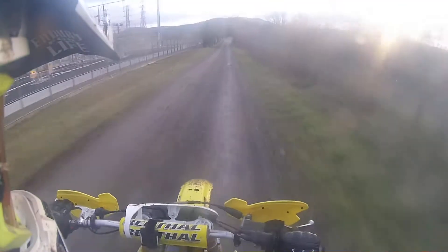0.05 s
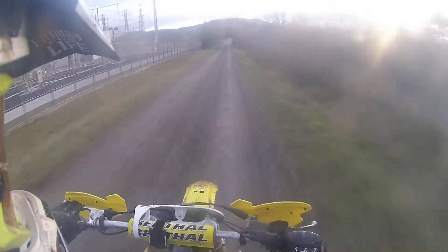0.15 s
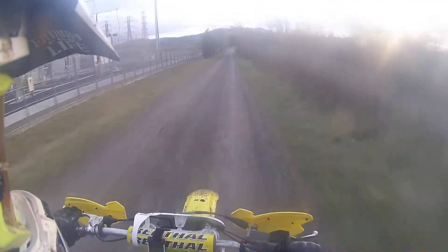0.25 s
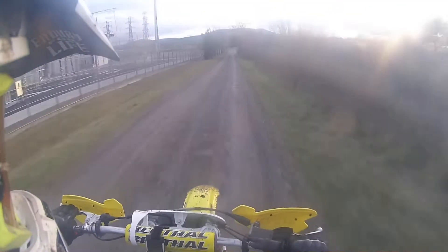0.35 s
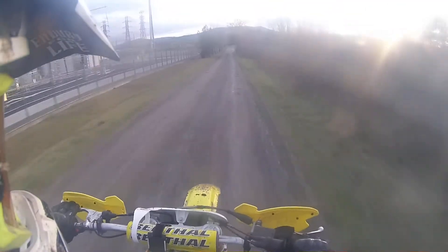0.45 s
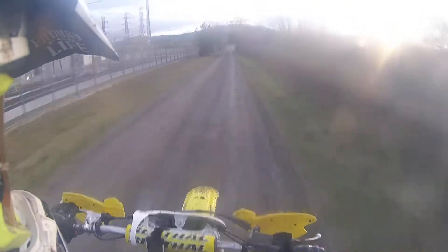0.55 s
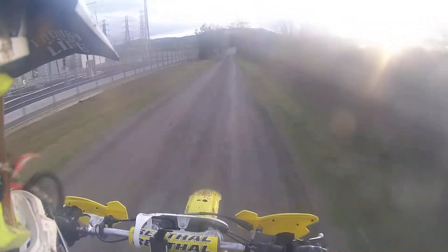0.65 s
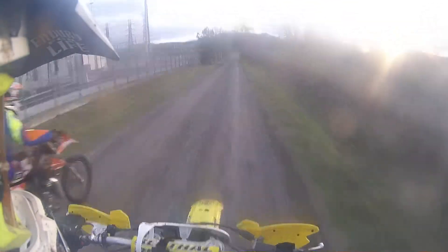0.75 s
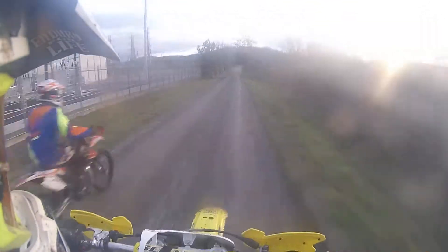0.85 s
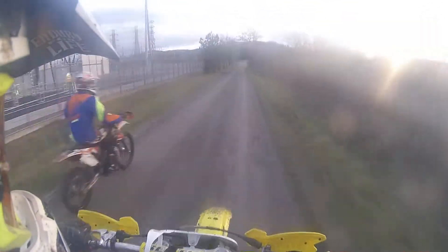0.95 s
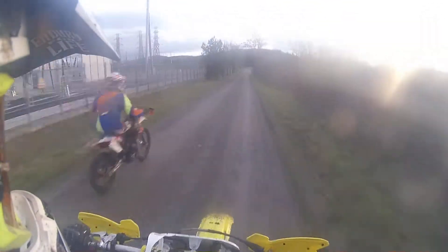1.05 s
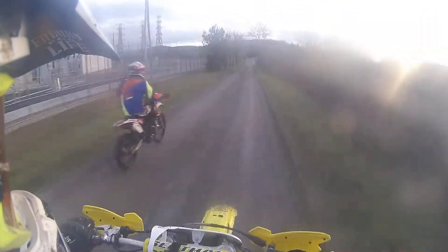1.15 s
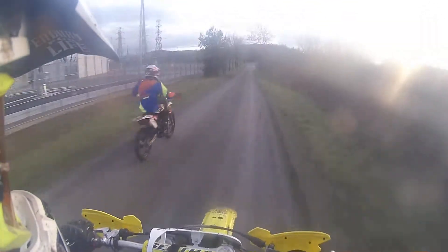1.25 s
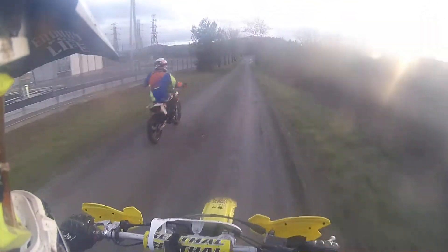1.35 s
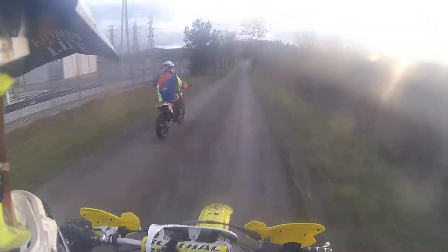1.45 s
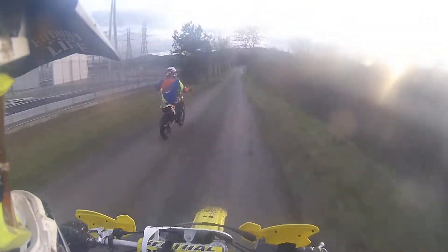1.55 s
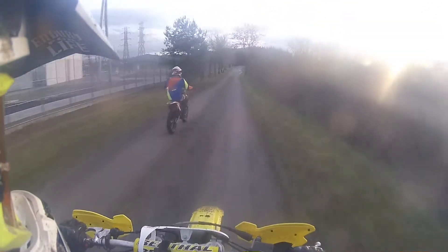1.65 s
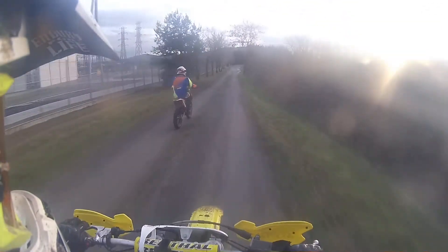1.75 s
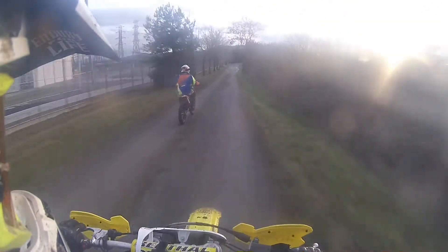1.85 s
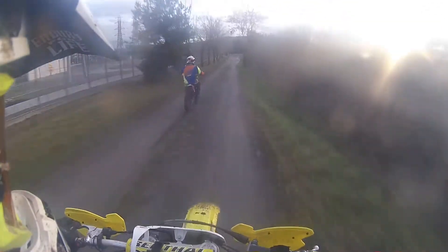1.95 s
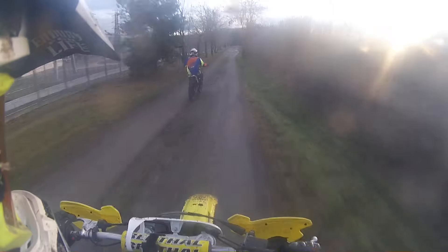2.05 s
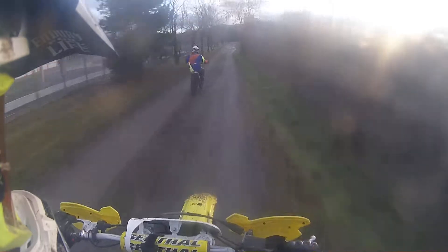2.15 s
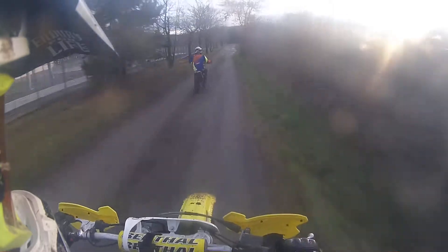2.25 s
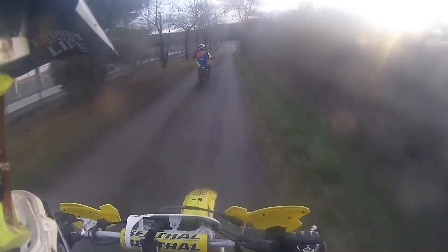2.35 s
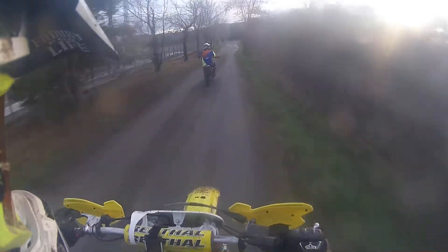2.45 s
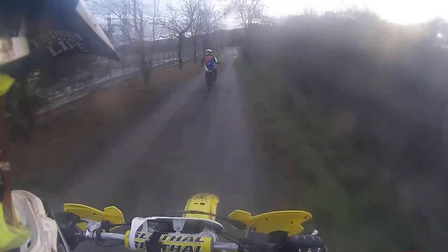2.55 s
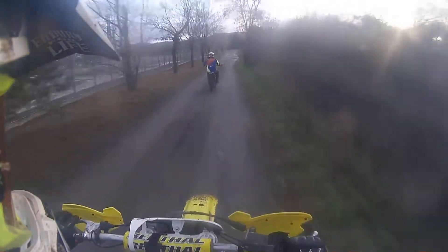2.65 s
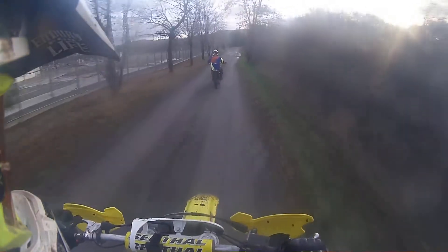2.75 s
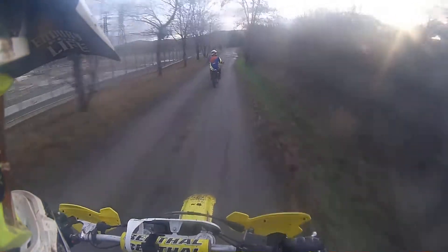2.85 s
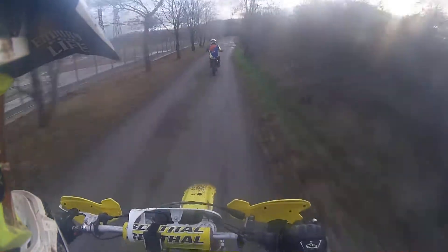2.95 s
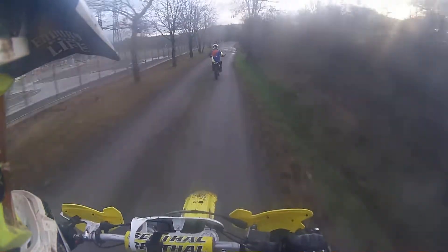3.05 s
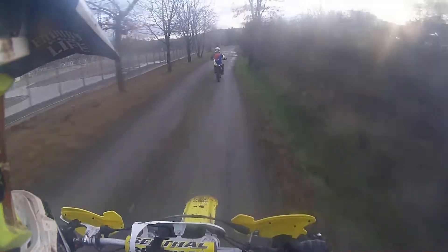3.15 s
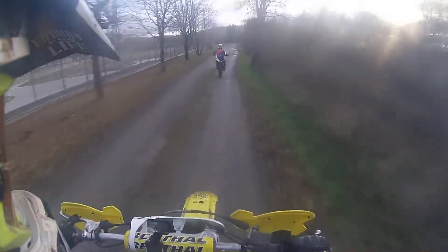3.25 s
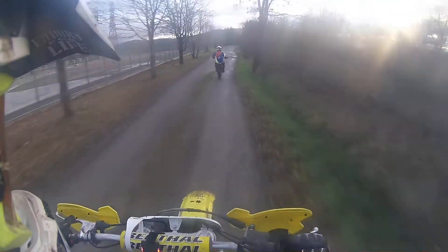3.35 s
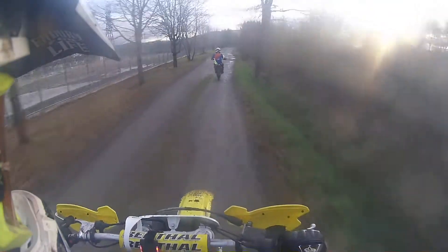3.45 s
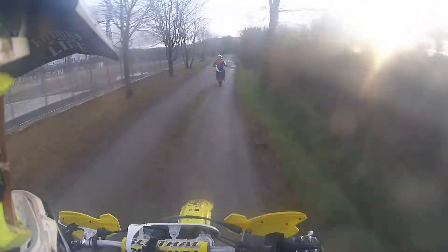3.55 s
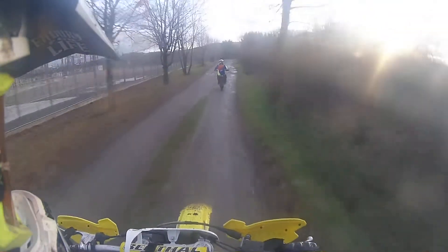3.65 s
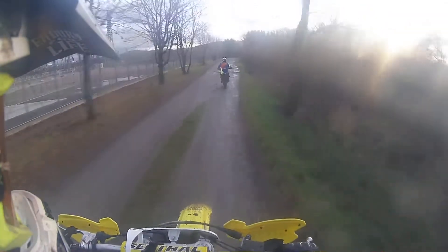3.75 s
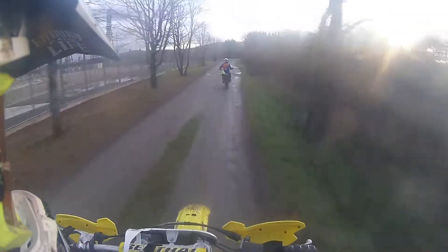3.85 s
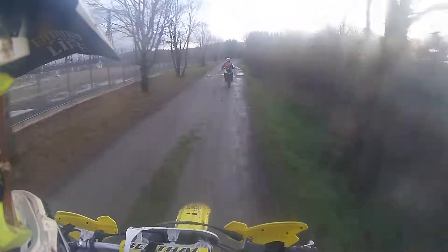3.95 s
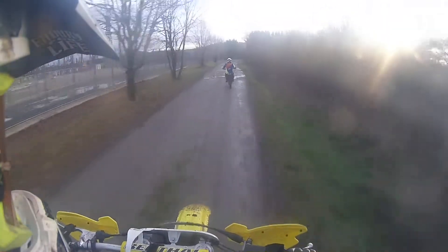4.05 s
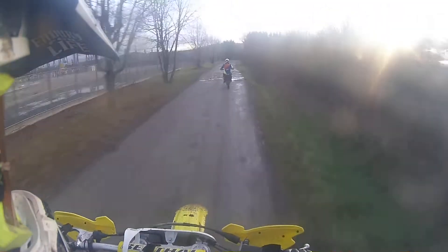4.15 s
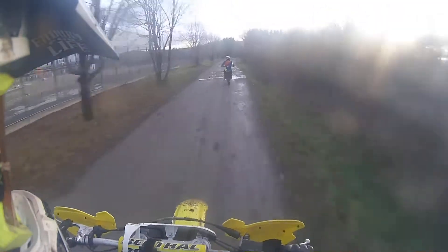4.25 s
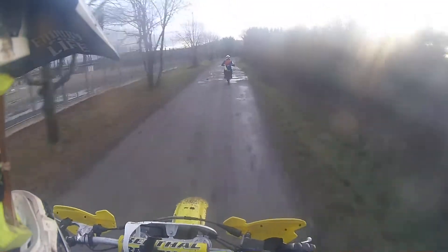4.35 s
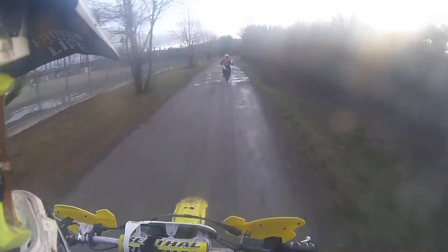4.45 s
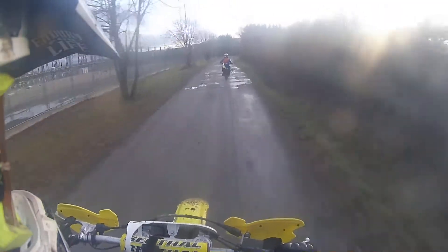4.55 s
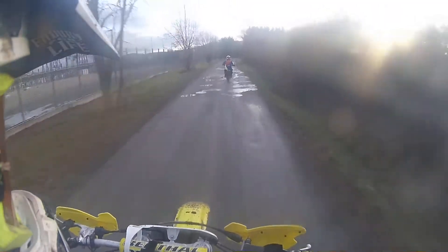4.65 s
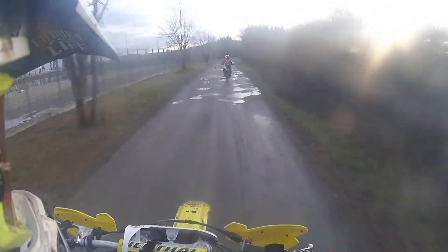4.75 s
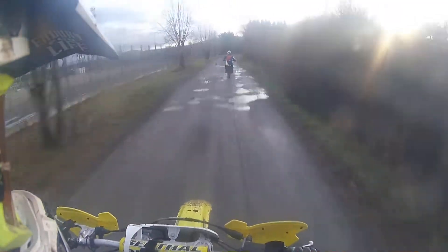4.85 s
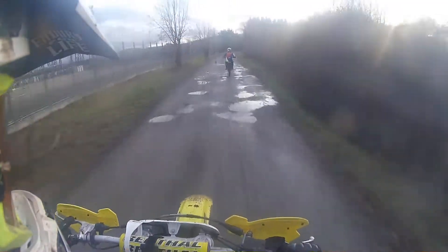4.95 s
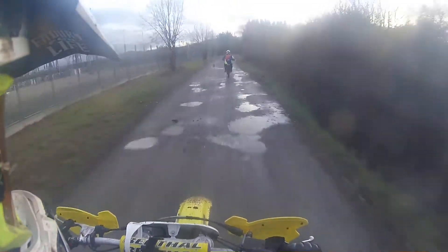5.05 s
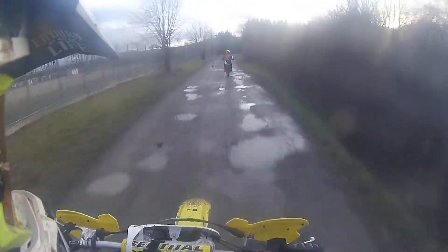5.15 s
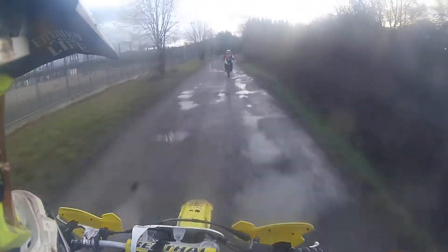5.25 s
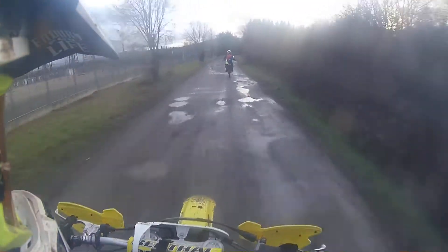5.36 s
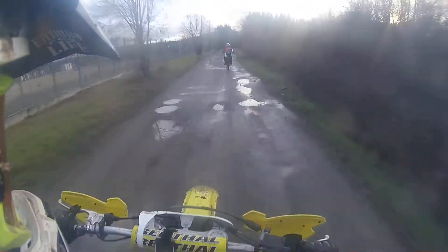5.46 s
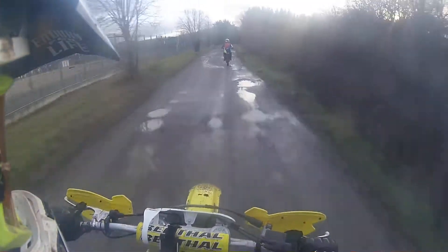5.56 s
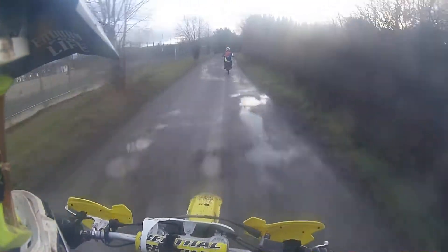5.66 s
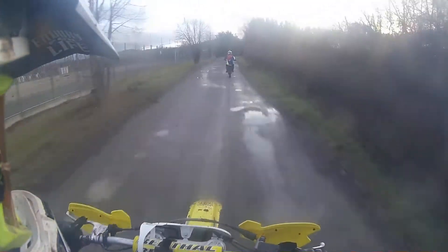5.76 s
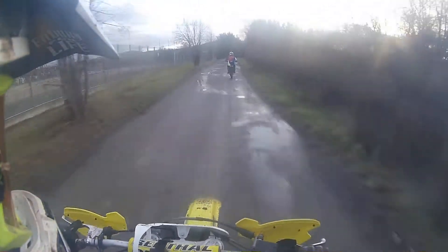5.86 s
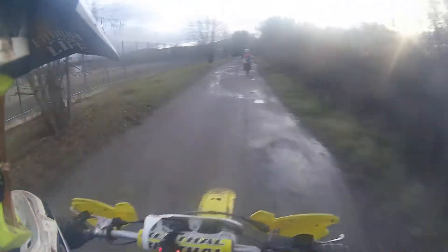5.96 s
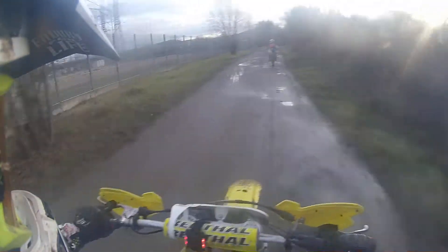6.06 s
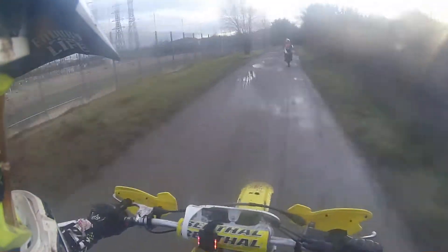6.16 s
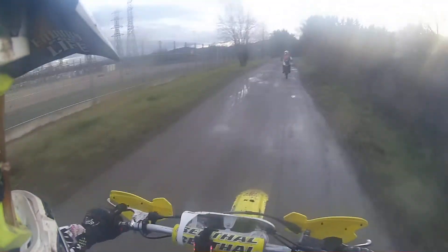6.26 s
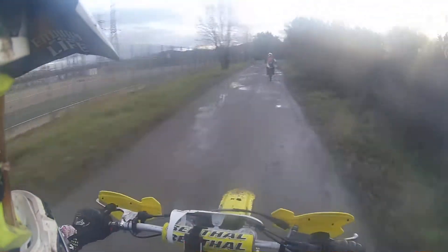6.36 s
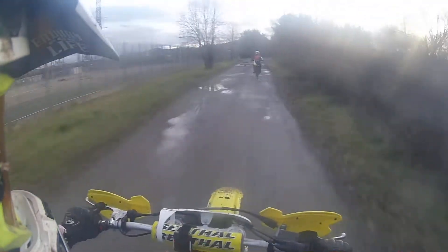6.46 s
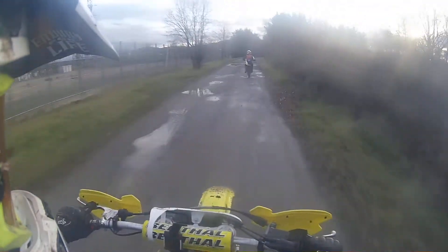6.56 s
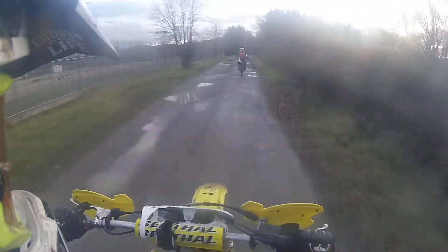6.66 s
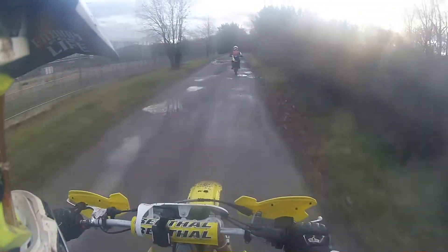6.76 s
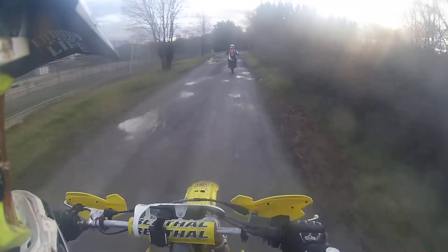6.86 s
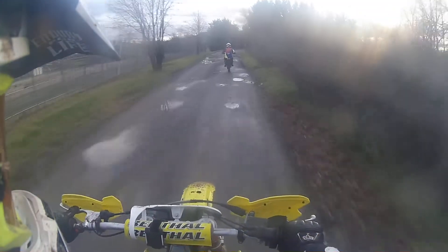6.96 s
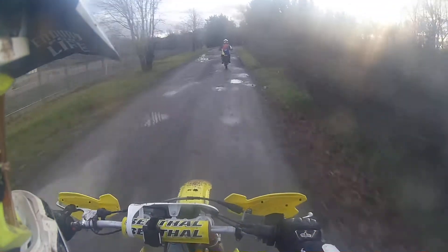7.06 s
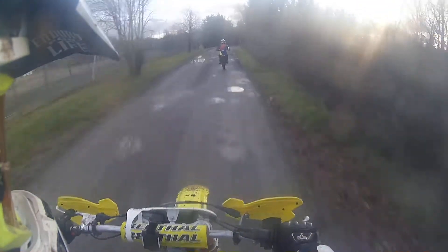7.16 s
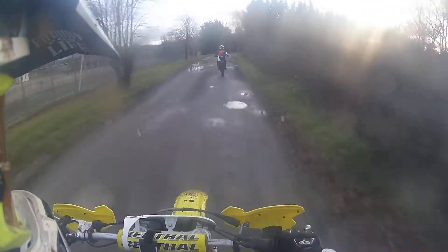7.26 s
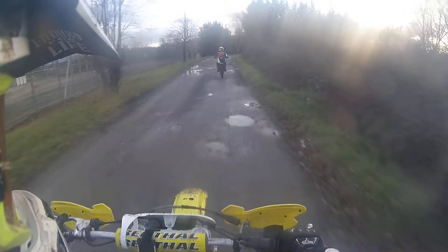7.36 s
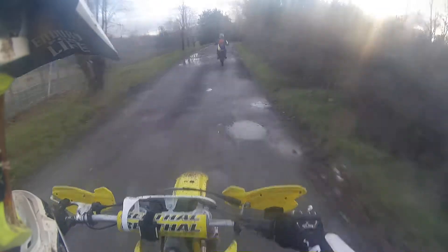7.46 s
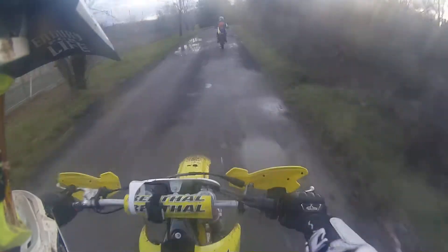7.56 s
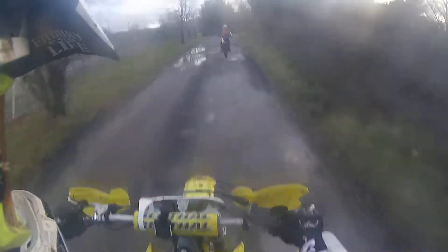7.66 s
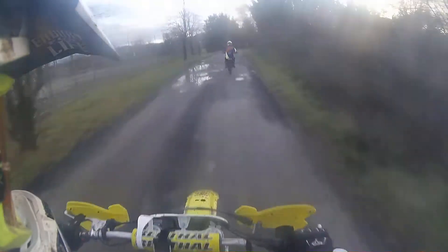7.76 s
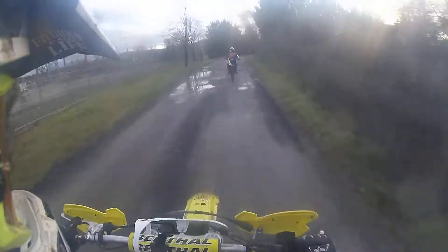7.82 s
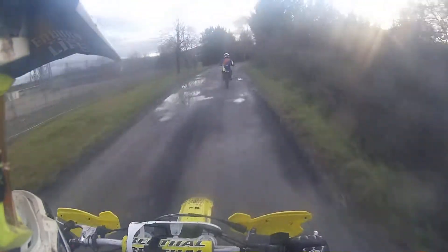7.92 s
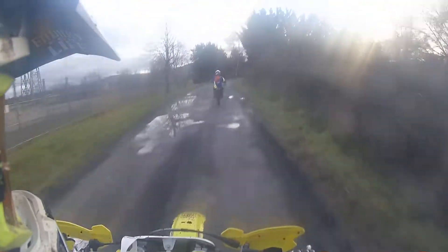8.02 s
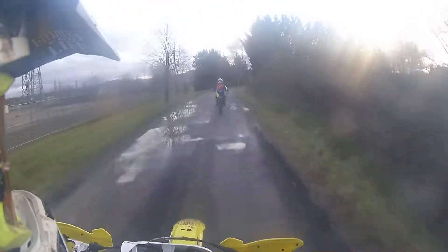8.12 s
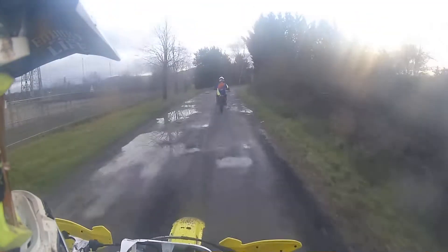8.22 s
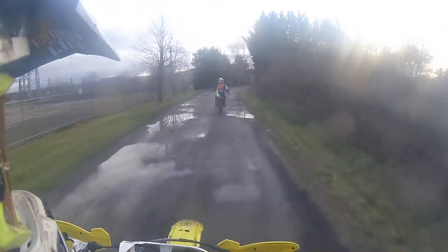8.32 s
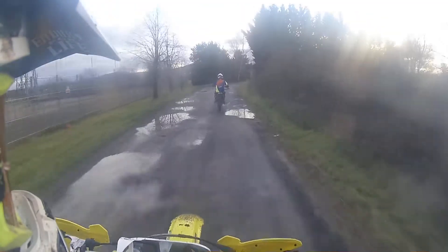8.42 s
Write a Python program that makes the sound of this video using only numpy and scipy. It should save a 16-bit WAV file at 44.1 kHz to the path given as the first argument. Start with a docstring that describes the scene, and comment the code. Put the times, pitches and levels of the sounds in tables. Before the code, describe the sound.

A single-cylinder dirt bike revs loud and high from the start, climbing slightly for the first second, heard close and boxy through a plastic housing on the rider's helmet. A second bike overtakes with a wavering, raspy drone, loudest around 0.8 seconds and gone by 1.3. From 1 second the engine pitch drops sharply, bottoming out near 1.7, then picks up at 2 seconds into a steadier, thumping run that slowly sinks. From about 2.1 to 5.7 seconds a loose part knocks and clicks against the housing in quick irregular hits, strongest before 4 seconds. The engine firms up slightly around 6 seconds, then eases off from 7, with a few lighter clicks between 7.4 and the end at 8.5 seconds. Low wind buffeting and the hiss of chain and tyres run underneath, gradually fading along with the engine.

```python
"""Dirt bike from a helmet camera

A single-cylinder bike, heard inside a closed plastic housing, revs, shuts off, picks up and slows to a
steady run. Each firing thumps the exhaust pipe and raps the housing. Chain, tyres and wind roar behind
it, a loose part knocks on the housing over the bumps, and a second bike overtakes early on."""
import sys
import numpy as np
from scipy import signal
from scipy.fft import rfft, irfft, next_fast_len
from scipy.io import wavfile
from scipy.ndimage import uniform_filter1d, map_coordinates

SR = 44100
rng = np.random.default_rng(int(sys.argv[2]) if len(sys.argv) > 2 else 0)


def file_out(sig):
    """Save sig as 16-bit WAV at sys.argv[1]."""
    # one column per channel
    cols = np.atleast_2d(sig).T
    # limit, then scale
    lim = np.clip(cols, -1, 1)
    pcm = np.round(lim * 32767).astype(np.int16)
    wavfile.write(sys.argv[1], SR, pcm)


N = 374409

# Engine speed: t/s, firing rate/Hz
FIRING_RATE = [(0, 83.6), (.412, 91.4), (.65, 94.2), (.818, 95.8), (.955, 95), (1.008, 91.7), (1.259, 67.4),
               (1.387, 57.4), (1.55, 47.7), (1.69, 44.2), (1.843, 49.3), (2.085, 65.8), (2.146, 66.8),
               (2.39, 65.6), (2.635, 65.6), (2.98, 62.1), (3.441, 59.5), (3.644, 59), (4.453, 55.1),
               (5.177, 49.9), (5.706, 49), (5.95, 50.2), (6.79, 51), (7.227, 46.6), (7.615, 46.7),
               (7.834, 44.2), (8.107, 44.2), (8.49, 42.3)]
# Throttle: t/s, opening/0-1
THROTTLE = [(0, 1), (.99, 1), (1.03, .9), (1.27, .8), (1.45, .3), (1.85, .2), (2.05, .6), (3, .35),
            (5.75, .3), (5.95, 1), (6.85, 1), (7.1, .1), (8.49, 0)]
# Exhaust: t/s, boom level/dB, bark level/dB
EXHAUST_LEVELS = [(0, -26.5, -14.5), (.4, -35, -11), (.8, -31, -11.5), (1.0, -31, -17.5), (1.03, -23, -28),
                  (1.27, -24.5, -33), (1.5, -29, -39), (1.85, -37.5, -33.5), (2.01, -25, -32),
                  (2.76, -26, -31.5), (3.9, -26, -39), (5.63, -29, -45.5), (5.7, -34.5, -80),
                  (5.95, -29.5, -38.5), (6.82, -27.5, -37), (6.95, -31.5, -47), (7.15, -33.5, -45),
                  (7.35, -30.5, -41), (8, -33.5, -43), (8.49, -38, -49.5)]
# Pipe resonances: f/Hz, width/Hz, gain/dB
PIPE_MODES = [(125, 105, -6), (167.6, 67, -4.5), (239.4, 52.5, 4), (312, 52, -6), (434, 62, -5)]
# Bark resonances, low revs: f/Hz, width/Hz, gain/dB
BARK_LOW_MODES = [(584, 500, -12.5), (830, 220, -3.5), (1052, 118, -1), (1590, 260, -20)]
# Bark resonances, high revs: f/Hz, width/Hz, gain/dB
BARK_HIGH_MODES = [(188, 14, 2.5), (450, 32, 0), (684, 65, -6.5), (896, 113, -3.5), (1097, 124, -1),
                   (1354, 54, 0), (1538, 82, 4), (1750, 97, -0.5), (1978, 41, 2), (2240, 60, -10)]
# Housing resonances: f/Hz, width/Hz, gain/dB
HOUSING_MODES = [(466, 165, -5.5), (768, 192, -2), (1052, 184, -0.5), (1507, 149, -1.5), (1916, 255, -6.5),
                 (2293, 106, 0.5), (3530, 1300, -44), (4200, 244, -18.5)]
# Loose part: t/s, ring peak/dB, high-over-low tilt/dB
KNOCKS = [(2.12, -1.5, 0), (2.223, 0, -5), (2.45, -7, 7), (2.574, -10.5, 12), (2.68, 2.5, 1),
          (2.79, 0.5, 0), (2.917, -13.5, 5), (3.062, -8.5, 1), (3.357, -2.5, 0), (3.455, -1.5, -5),
          (3.571, 0, -4), (3.672, -1, 2), (3.913, 1, 3.5), (4.035, -10.5, 6), (4.142, -10.5, -3),
          (4.249, -10, 6), (4.375, -2.5, -3), (4.501, -18, -3), (4.631, -27, -11), (4.762, -14.5, -10),
          (4.894, -9, 7), (4.988, -9, -3), (5.086, -14.5, 5), (5.184, -13, -1), (5.362, -9, -4),
          (5.665, -18, -1), (7.362, -14.5, 0), (7.795, -12, 3), (7.841, -22, 11), (8.112, -20.5, 1),
          (8.365, -14, 1), (8.461, -19, 7)]
# Struck housing: f/Hz, relative level/dB, T60/s
KNOCK_MODES = [(471, -10.5, 0.043), (1423, 4.5, 0.015), (1588, 5.5, 0.02), (1922, 0, 0.016),
               (3250, -15, 0.012), (4200, -13.5, 0.016)]
# Second bike: t/s, f/Hz, drone level/dB, overtone level/dB, rasp level/dB
OVERTAKE = [(0, 400, -46, -12.5, -24), (.3, 411.5, -67, -20, -18), (.55, 416, -29, -3, -18.5),
            (.74, 420, -21, -18, -18), (.85, 422, -26, 1.5, -16), (.88, 422, -29, -4, -27),
            (1.0, 420, -40, -11, -36), (1.3, 400, -57, -20, -45)]
# Its overtones: harmonic number, level offset/dB
OVERTONES = [(3, 1), (5, 6), (6, 7)]
# Its rasp: f/Hz, relative density/dB
RASP_SPECTRUM = [(1060, -25), (1800, -3), (2330, -3), (3830, -20.5), (4290, -25.5), (10400, -32.5),
                 (15000, -32)]
# Wind on the housing: f/Hz, relative density/dB
WIND_SPECTRUM = [(12, -49), (20, -17.5), (113, 2), (177, 2), (252, -6.5), (348, -13.5), (400, -11),
                 (520, -10), (880, -120)]
# Chain and tyres: f/Hz, relative density/dB
HISS_SPECTRUM = [(1530, 0), (2600, 7), (3530, 1), (3920, -5.5), (4260, -31), (4620, -13.5), (5870, -27),
                 (9680, -15.5), (13800, -31), (15500, -48)]


def amp(db):
    """dB to gain."""
    return 10 ** (np.asarray(db) / 20)


def unit(x):
    """Scale to rms 1."""
    return x / np.sqrt(np.mean(x ** 2) + 1e-20)


def steady(x):
    """Level to a running rms of 1."""
    return x / np.sqrt(np.abs(uniform_filter1d(x ** 2, size=SR // 8)) + 1e-12)


def curves(rows):
    """One per-sample curve for each column after time."""
    times_s, *columns = np.transpose(rows)
    return [np.interp(np.arange(N) / SR, times_s, column) for column in columns]


def wobble(rate_hz):
    """Smooth random curve, knots at rate_hz."""
    knots = rng.standard_normal(int(N * rate_hz / SR) + 4)
    return map_coordinates(knots, [np.arange(N) * rate_hz / SR])


def filtered(x, response):
    """Apply a complex frequency response."""
    size = next_fast_len(N + SR // 2)
    return irfft(rfft(x, size) * response(np.fft.rfftfreq(size, 1 / SR)), size)[:N]


def resonant(x, modes):
    """Parallel band-passes of alternating sign; rows of f/Hz, width/Hz, gain/dB."""
    return filtered(x, lambda f: sum(
        (-1) ** k * amp(db) * 1j * f * width / (hz * hz - f * f + 1j * f * width)
        for k, (hz, width, db) in enumerate(modes)))


def coloured(spectrum):
    """Shaped noise, rms 1."""
    hz, db = np.transpose(spectrum)
    return unit(filtered(rng.standard_normal(N), lambda f: amp(np.interp(np.log(f + 1), np.log(hz), db))))


def firings(cycles, jitter_s, scatter_db):
    """One impulse per engine cycle, uneven in time and size."""
    due = np.interp(np.arange(1, int(cycles[-1])), cycles, np.arange(N))
    index = due.astype(int)
    timing, size = rng.standard_normal((len(due), 2)).T
    onsets = np.clip(due + jitter_s[index] * SR * timing, 0, N - 1).astype(int)
    return np.bincount(onsets, amp(scatter_db[index] * size), N)


def exhaust(cycles, shut, revs):
    """Firings bark at once, then boom in the pipe. A shut throttle fires unevenly; revs brighten the bark."""
    boom_db, bark_db = curves(EXHAUST_LEVELS)
    cracks = firings(cycles, jitter_s=.00002 + .0004 * shut, scatter_db=.8 + 1.8 * shut)
    pushes = firings(cycles, jitter_s=.0002 * shut, scatter_db=.6 + shut)
    pipe = resonant(pushes, PIPE_MODES)
    boom = np.roll(steady(resonant(pipe, [(292, 410, 0)])), SR // 400)
    pipe_end_echo = np.roll(resonant(cracks, [(2250, 120, -3.5)]), SR // 230)
    high_bark = resonant(resonant(cracks, BARK_HIGH_MODES) + pipe_end_echo, [(1170, 4000, 0)])
    low_bark = resonant(cracks, BARK_LOW_MODES)
    bark = revs * steady(high_bark) + (1 - revs) * steady(low_bark)
    return amp(boom_db) * boom + amp(bark_db) * bark


def housing_clatter(t, firing_hz, shut, swell):
    """Firings rap the housing. Level lags engine speed, eases with time and a shut throttle."""
    cruise_hz, lag_s, db_per_hz, fade_db_per_s = 50, 0.78, 0.1858, 0.92
    step = 1 / (lag_s * SR)
    lagged_hz = firing_hz[0] + signal.lfilter([step], [1, step - 1], firing_hz - firing_hz[0])
    level_db = -28.5 + db_per_hz * (lagged_hz - cruise_hz) - fade_db_per_s * t - 2.5 * shut
    raps = swell * amp(1.64 * wobble(30)) * rng.standard_normal(N)
    return amp(level_db) * unit(resonant(raps, HOUSING_MODES))


def housing_ring(t, side_db, tilt_db):
    """One blow: damped modes, tilted low and high side rings, one rebound. Peak 1."""
    def mode(hz, db, t60_s):
        return amp(db - 60 * t / t60_s) * np.sin(2 * np.pi * hz * t)

    low_db, high_db = side_db - tilt_db / 2, side_db - 12 + tilt_db / 2
    ring = sum(mode(hz, db + rng.normal(0, 4.7), t60_s) for hz, db, t60_s in KNOCK_MODES)
    ring += mode(1100, low_db, 0.012)
    ring += mode(2300, high_db, 0.037) + 1.04 * mode(2750, high_db, 0.017)
    ring *= 1 - np.exp(-t / 0.00035)
    rebound = SR // 200
    ring[rebound:] -= 0.33 * ring[:-rebound]
    return ring / np.abs(ring).max()


def knocks():
    """A loose part strikes the housing: a ring plus a bright tick that also shakes the housing."""
    rings, ticks = np.zeros((2, N + SR))
    t = np.arange(SR // 12) / SR
    tick_envelope = amp(-60 * t / 0.0096) + 0.2 * amp(-60 * t / 0.15)
    for onset_s, peak_db, tilt_db in KNOCKS:
        soft_db = -0.3 * peak_db  # softer blows: relatively more side ring and tick
        start = round((onset_s + 0.00022) * SR)
        span = slice(start, start + len(t))
        rings[span] += amp(peak_db) * housing_ring(t, 4 + soft_db, tilt_db)
        ticks[span] += amp(peak_db - 26 + soft_db) * tick_envelope * rng.standard_normal(len(t))
    shake = amp(17.5) * resonant(ticks[:N], HOUSING_MODES)
    bright = resonant(resonant(ticks[:N], [(5300, 7100, 0)]), [(6500, 34000, 0)])
    return rings[:N] + shake + bright


def overtaking_bike(t):
    """Wavering exhaust drone; overtones flare alongside, rasp drops once past."""
    hz, drone_db, overtone_db, rasp_db = curves(OVERTAKE)
    phase = 2 * np.pi * np.cumsum(hz) / SR + .5 * wobble(24.65)
    drone = np.sin(phase) + 0.82 * np.sin(2 * phase)
    drone += sum(amp(overtone_db + db) * np.sin(k * phase) for k, db in OVERTONES)
    rasp = unit(amp(1.1 * wobble(60.8)) * coloured(RASP_SPECTRUM))
    audible = t < OVERTAKE[-1][0]
    return audible * (amp(drone_db) * drone + amp(rasp_db) * rasp)


def wind(t, start_db=-22.5, fade_db_per_s=1.5):
    """Wind buffets the housing in lumps, easing over time."""
    buffet = unit(amp(2.05 * wobble(12)) * coloured(WIND_SPECTRUM))
    return amp(start_db - fade_db_per_s * t) * buffet


def chain_and_tyres(t, swell, revs, base_db=-33, fade_db_per_s=2, revs_lift_db=4):
    """Hiss that beats with the engine, lifts at high revs and eases over time."""
    hiss = unit(swell ** 0.22 * amp(1.15 * wobble(40)) * coloured(HISS_SPECTRUM))
    return amp(base_db - fade_db_per_s * t + revs_lift_db * revs) * hiss


def scene():
    """All sources at one microphone inside the housing."""
    t = np.arange(N) / SR
    firing_hz, = curves(FIRING_RATE)
    cycles = np.cumsum(firing_hz) / SR
    shut = 1 - curves(THROTTLE)[0]
    revs = np.clip((firing_hz - 60) / 25, 0, 1)
    swell = 1 + 0.17 * np.cos(2 * np.pi * (cycles - .4))  # peaks 0.4 cycle after each firing
    engine = exhaust(cycles, shut, revs) + housing_clatter(t, firing_hz, shut, swell)
    roar = wind(t) + chain_and_tyres(t, swell, revs)
    return (engine + roar + knocks() + overtaking_bike(t))[None]


def record(dry, rolloff_hz=12000, noise_db=-68, top_hz=15400):
    """Microphone: peak clipping, treble roll-off, self-noise, band limit."""
    clipped = dry[0] / (1 + np.abs(dry[0]) ** 16) ** (1 / 16)
    dulled = filtered(clipped, lambda hz: 1 / (1 + (hz / rolloff_hz) ** 8))
    noisy = dulled + amp(noise_db) * rng.standard_normal(N)
    return filtered(noisy, lambda hz: hz < top_hz)[None]


dry = scene()
out = record(dry)
file_out(out)
```